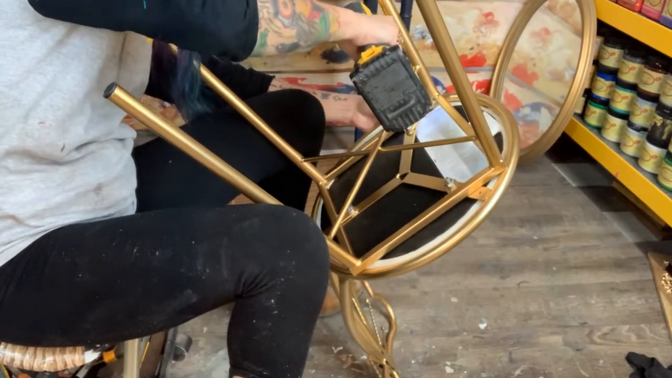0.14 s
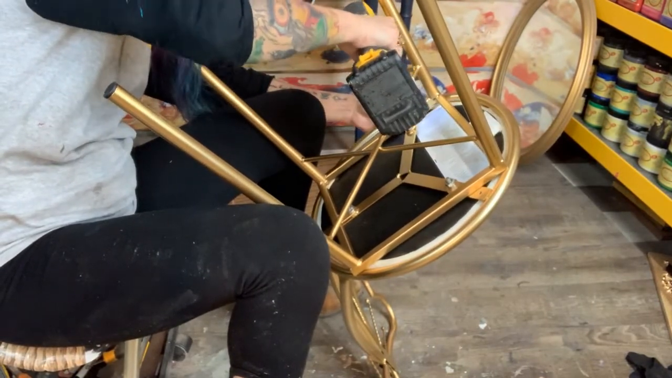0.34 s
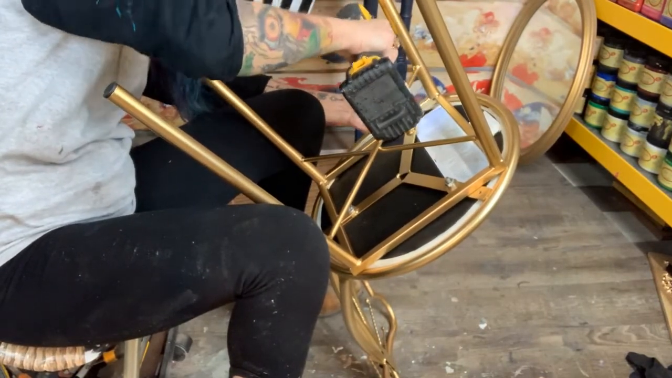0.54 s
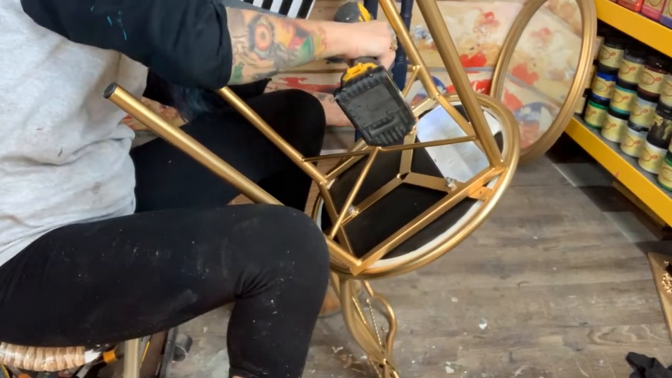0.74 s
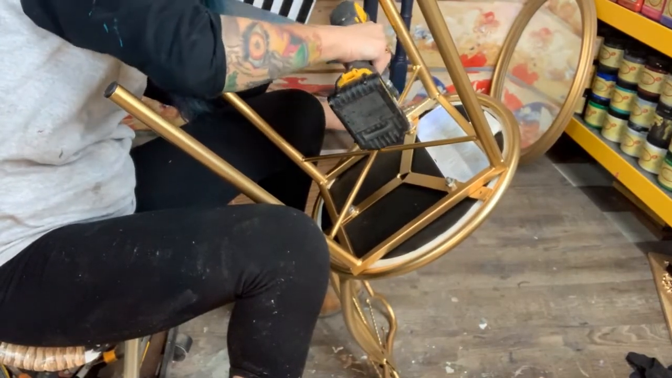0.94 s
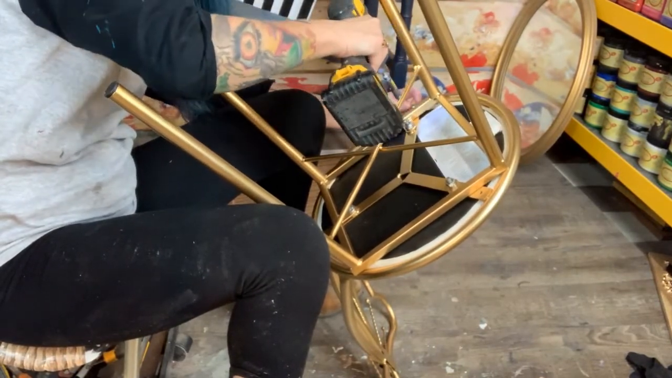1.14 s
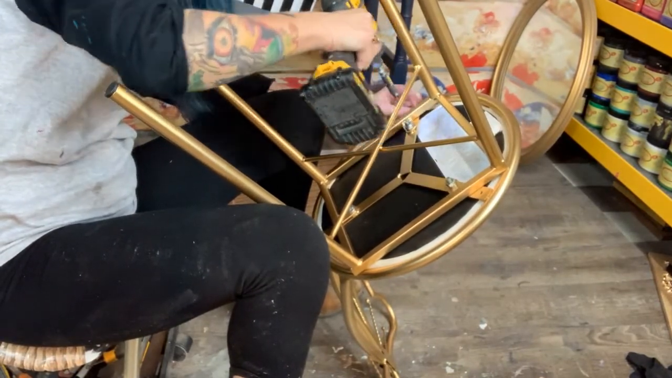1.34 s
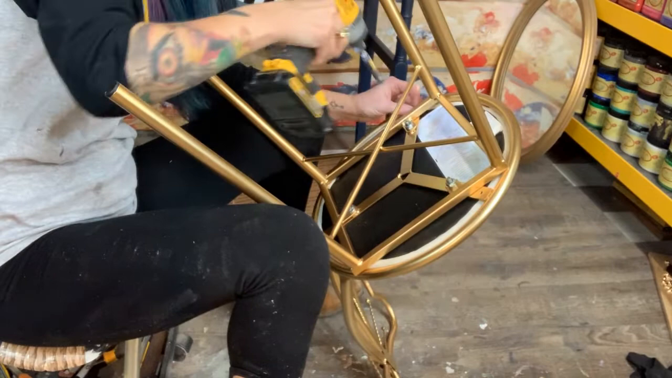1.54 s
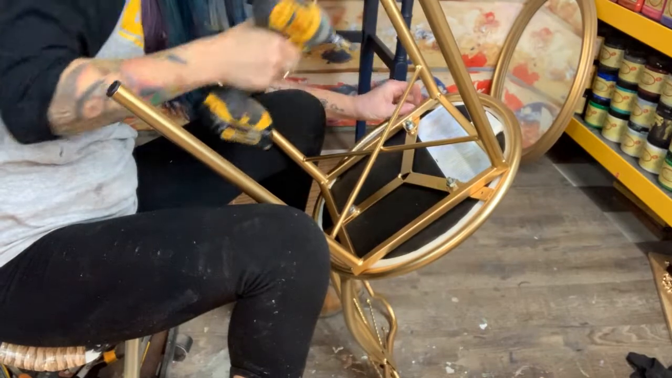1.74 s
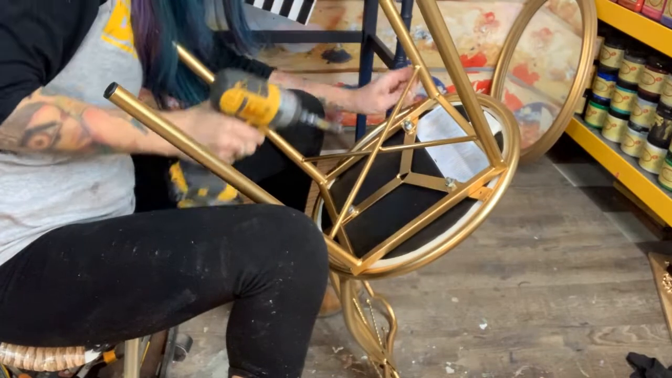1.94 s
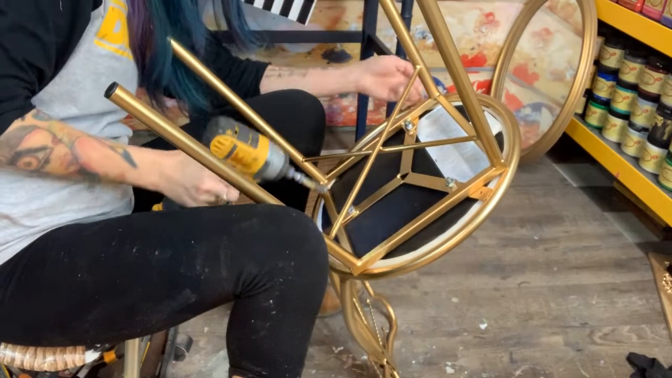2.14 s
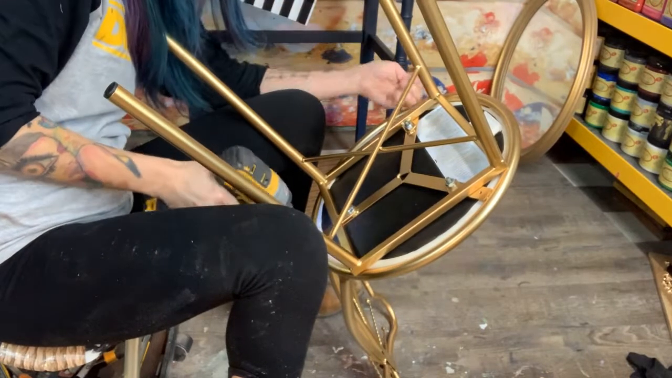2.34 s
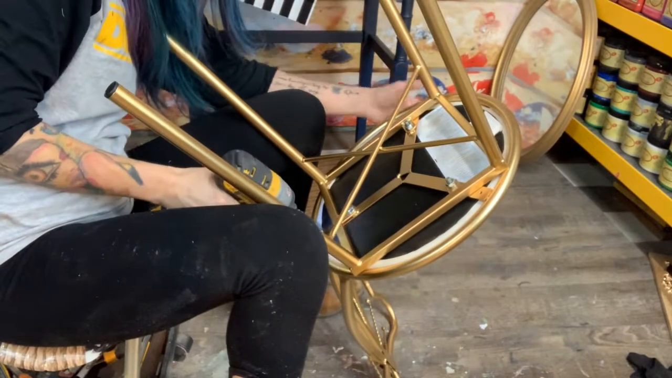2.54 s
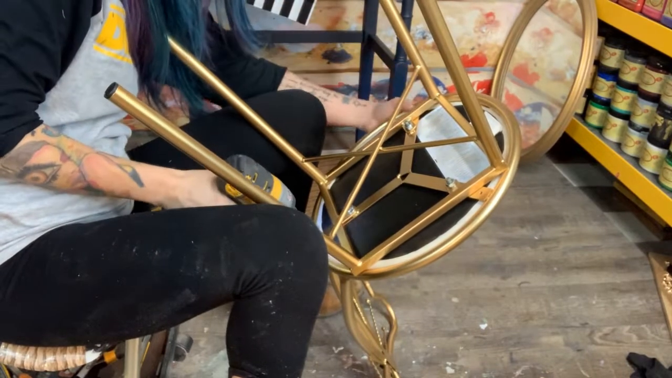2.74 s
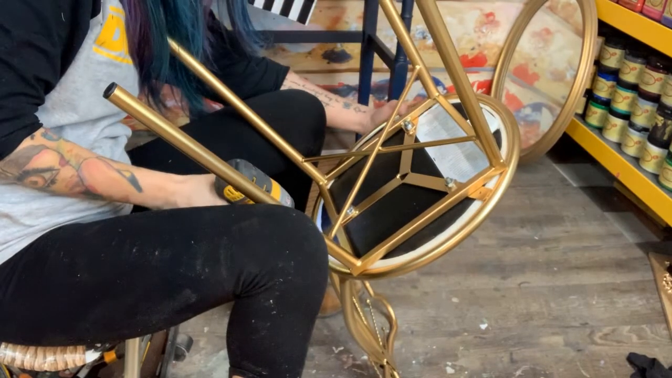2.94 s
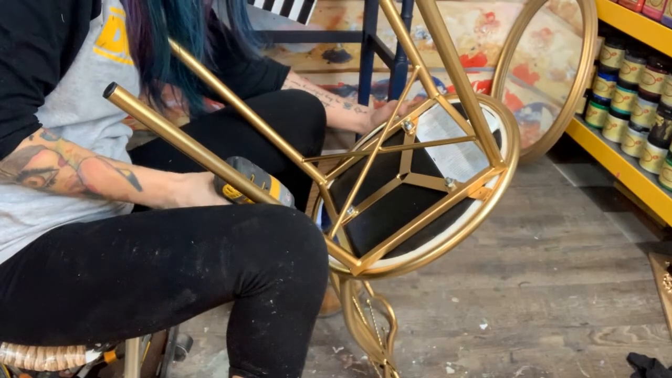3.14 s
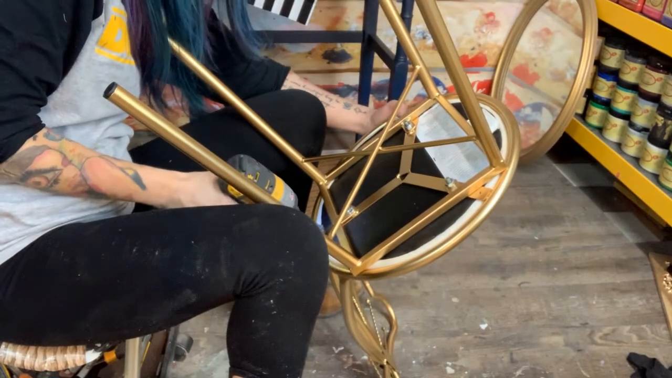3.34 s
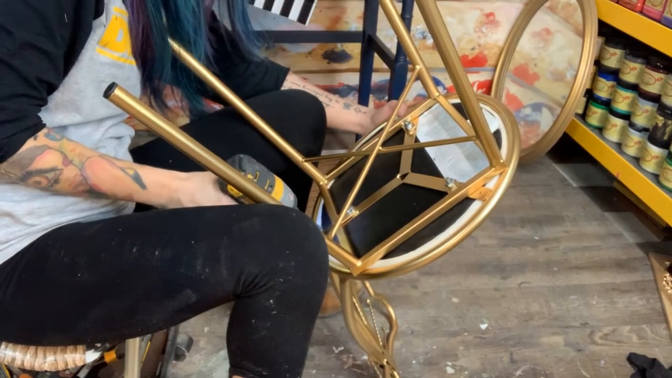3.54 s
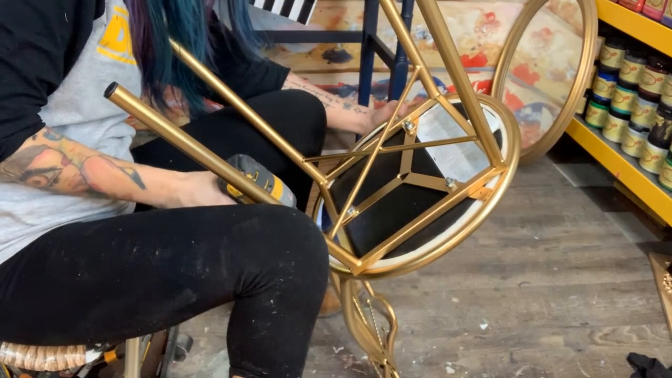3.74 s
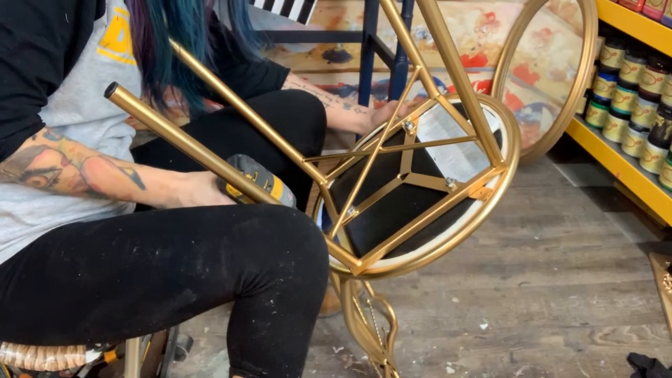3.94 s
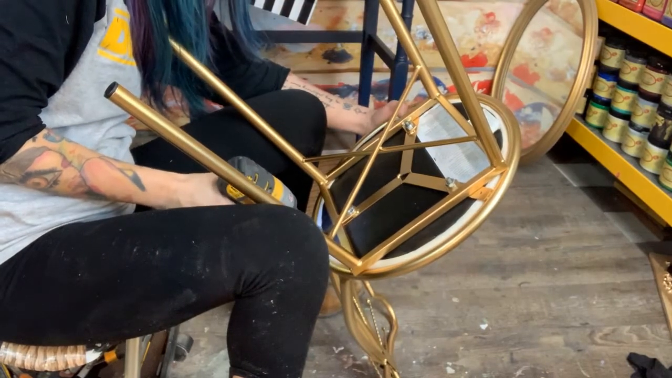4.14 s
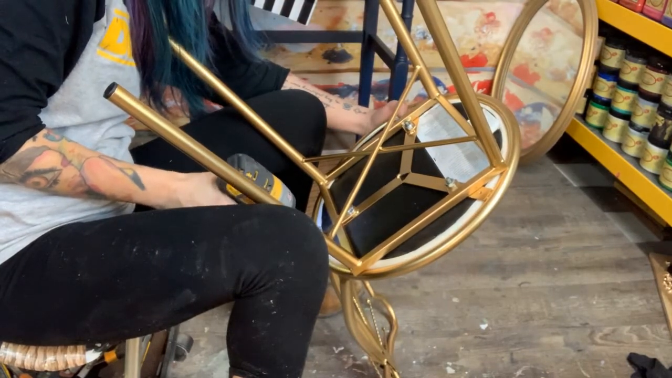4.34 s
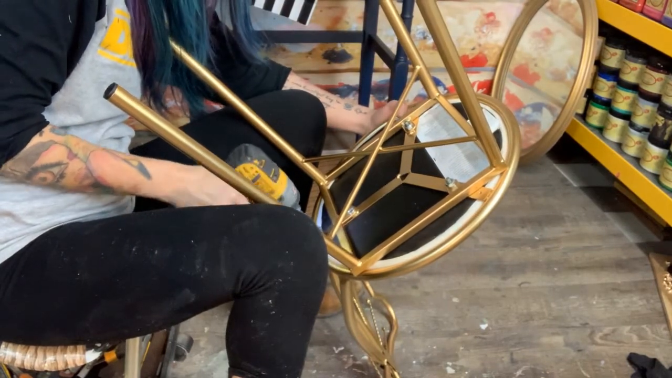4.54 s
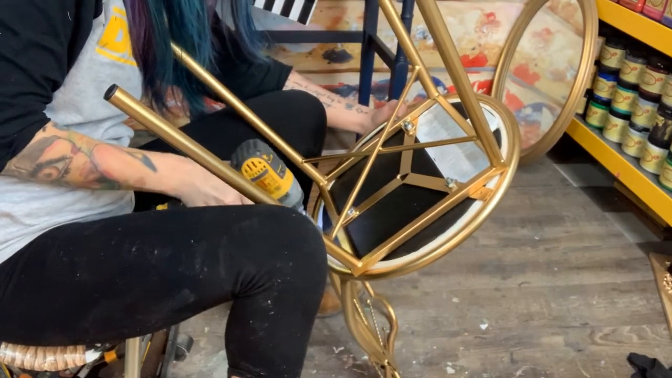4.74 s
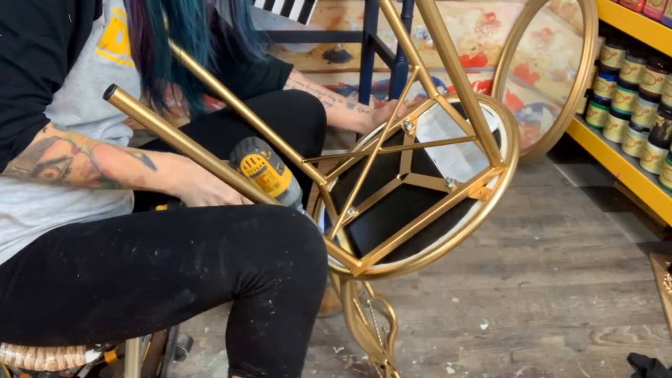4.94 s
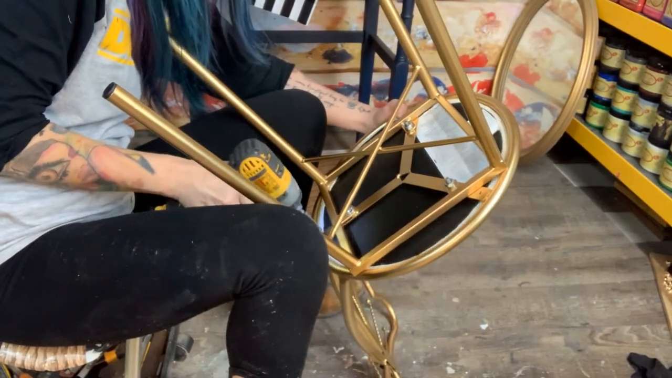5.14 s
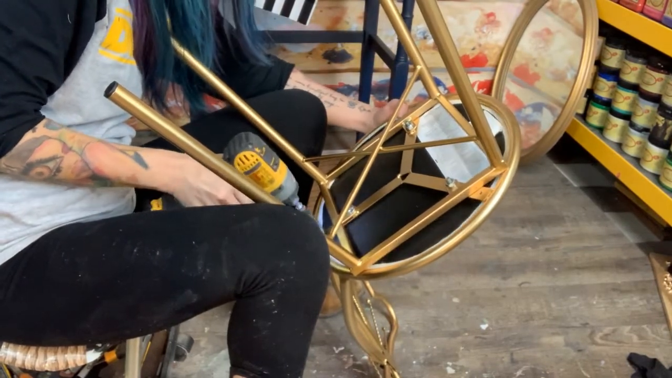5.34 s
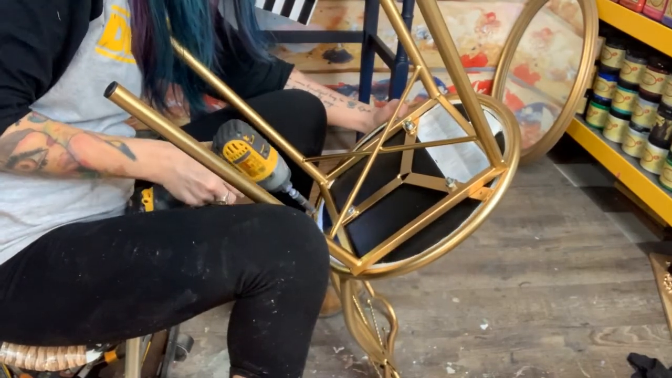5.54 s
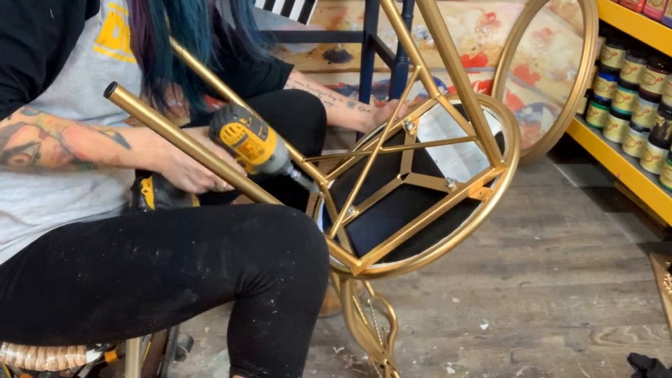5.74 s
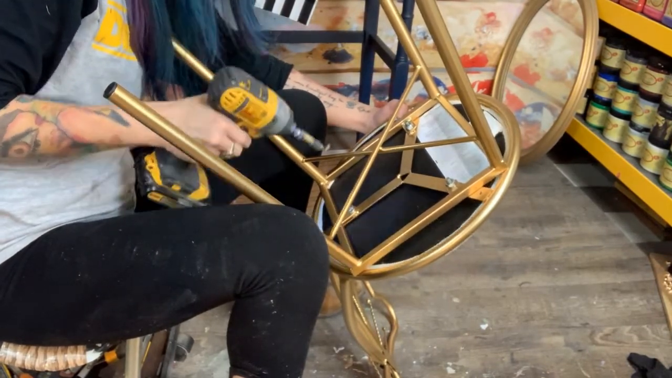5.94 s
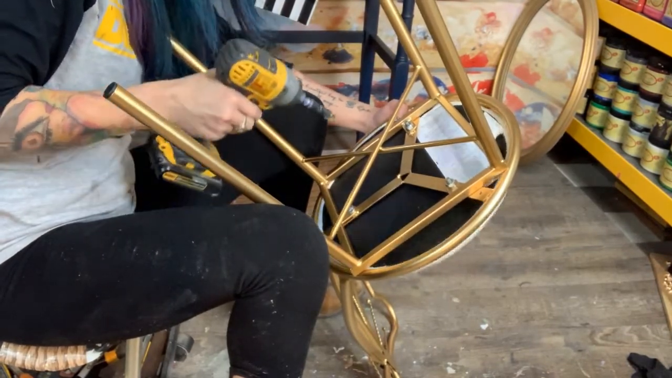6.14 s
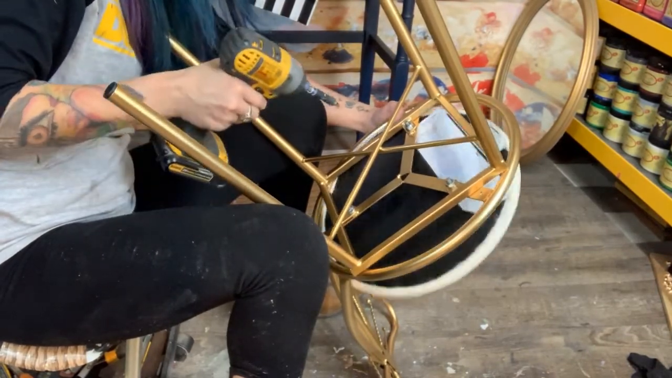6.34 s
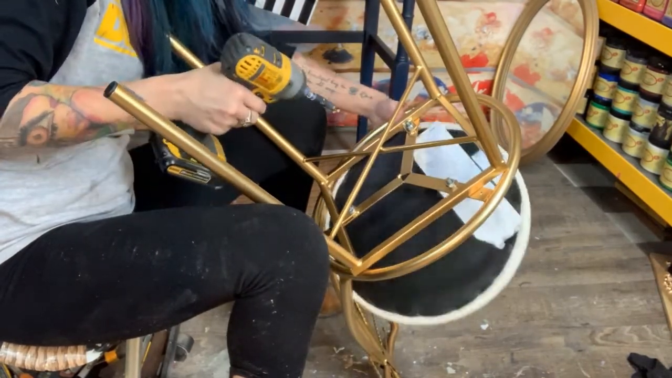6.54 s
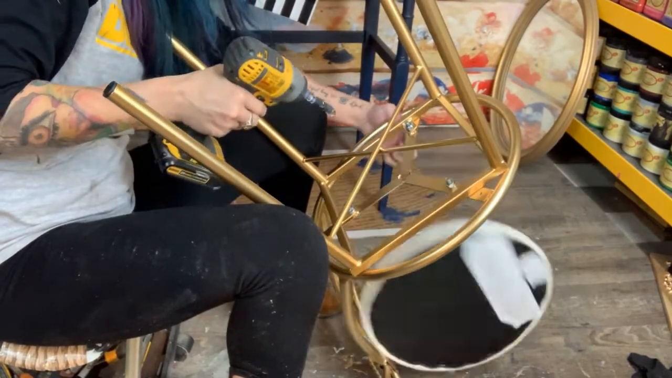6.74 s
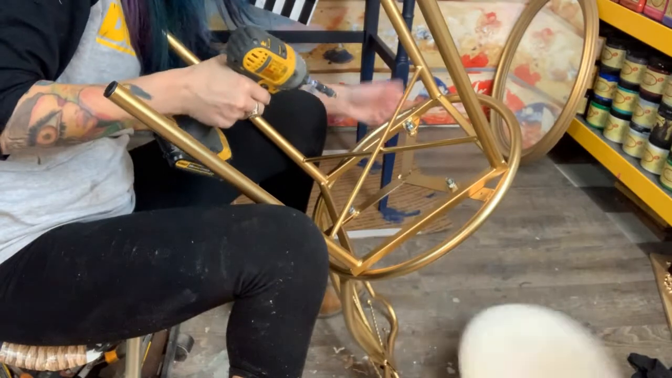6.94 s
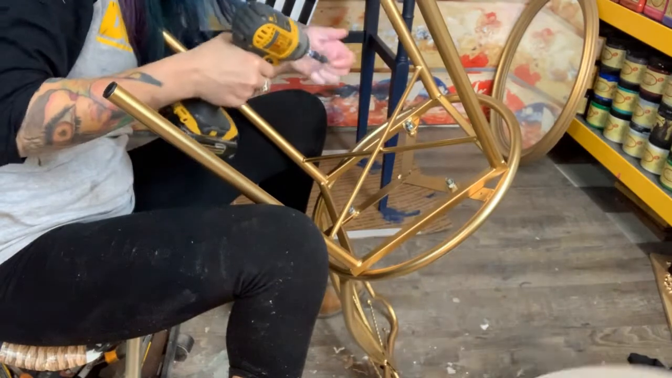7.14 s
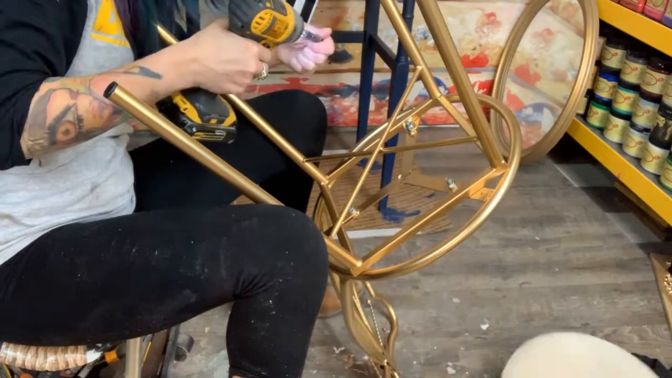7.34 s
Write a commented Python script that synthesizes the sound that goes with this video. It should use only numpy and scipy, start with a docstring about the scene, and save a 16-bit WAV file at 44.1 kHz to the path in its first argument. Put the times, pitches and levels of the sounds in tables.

```python
"""Ventilation rumbles as noise in a small shop while a cordless drill backs a screw out of an upturned metal stool.
The drill sums tones locked to its gear mesh with shaped noises: it spins up, whines and coasts down.
Then the bit ticks and scrapes on the frame as noise bursts, and the padded seat is knocked in damped modes.
The drill starts again with a clunk and backs out a second screw; at the end the seat drops, thumps and rolls
on a wooden floor. Two close microphone ports hear it."""
import sys
import numpy as np
from scipy import signal
from scipy.fft import rfft, irfft, next_fast_len
from scipy.io import wavfile
from scipy.ndimage import uniform_filter1d, map_coordinates

SR = 44100
rng = np.random.default_rng(int(sys.argv[2]) if len(sys.argv) > 2 else 0)


def inscribe(sig):
    """Save sig as 16-bit PCM at rate SR to the path in sys.argv[1].

    A 1-D sig is mono; a 2-D sig holds one channel per row.
    Samples are clipped to [-1, 1] before scaling.
    """
    pcm = np.round(np.clip(np.atleast_2d(sig).T, -1, 1) * 32767)
    wavfile.write(sys.argv[1], SR, pcm.astype(np.int16))


def volts_from_decibels(level):
    """Turn decibel levels (scalar or array-like) into linear amplitude factors."""
    exponent = np.asarray(level, float) / 20
    return 10 ** exponent


N = 330661

# likeness of the two channels of the room air and the drumming seat: pitch_hz, likeness (1 = same)
AIR_ALIKE = [(40, 0.95), (90, 0.82), (250, 0.98), (600, 0.2), (2000, 0.13), (10000, .5)]
# likeness of the two channels of close noises: pitch_hz, likeness (1 = same)
NEAR_ALIKE = [(300, 0.4), (1400, 0.57), (2500, 0.23), (4000, 0.29), (6500, 0.5), (9000, 1), (13000, 0.17)]


def unit(x, axis=None):
    """Scale to rms 1."""
    return x / np.sqrt(np.mean(x ** 2, axis, keepdims=True) + 1e-20)


def along(points, hz, column=1):
    """A column of a table that starts with Hz, read on a log frequency axis."""
    table = np.array(points, float)
    return np.interp(np.log(hz + 1), np.log(table[:, 0] + 1), table[:, column])


def curves(tables):
    """One value per sample for each column after the time; silence between tables."""
    rows = []
    for table in tables:
        silent = [-110] * len(table[0][1:])
        rows += [(table[0][0] - .01, *silent), *table, (table[-1][0] + .03, *silent)]
    s, *columns = np.transpose(rows)
    return [np.interp(np.arange(N) / SR, s, column) for column in columns]


def wobble(rate):
    """A smooth random curve, rate knots a second."""
    return map_coordinates(rng.standard_normal(int(N * rate / SR) + 4), [np.arange(N) * rate / SR])


def filtered(x, response):
    """x times a complex response of frequency."""
    m = next_fast_len(N + SR // 2)
    return irfft(rfft(x, m) * response(np.fft.rfftfreq(m, 1 / SR)), m)[..., :N]


def lump(hz, centre_hz, width_hz):
    """A causal resonance."""
    return 1j * hz * width_hz / (centre_hz ** 2 - hz ** 2 + 1j * hz * width_hz)


def twice_lump_db(centre_hz, width_hz):
    """The dB curve of noise passed through one resonance twice."""
    return lambda hz: 40 * np.log10(abs(lump(hz, centre_hz, width_hz)) + 1e-6)


def rush(gain_db, alike, patchy_db):
    """Stereo noise near rms 1 with patches of random gain in time and pitch; gain_db is a function of Hz."""
    z = signal.stft(rng.standard_normal((2, N)), nperseg=512)[2]
    field = uniform_filter1d(uniform_filter1d(rng.standard_normal(z.shape[1:]), 4, 0), 5, 1)
    pair = signal.istft(z * volts_from_decibels(patchy_db * unit(field)), nperseg=512)[1][:, :N]
    # the share of mid and side sets how alike the channels are
    angle = lambda hz: np.arccos(np.clip(along(alike, hz), -1, 1)) / 2
    mid, side = filtered(pair, lambda hz: volts_from_decibels(gain_db(hz)) * [np.cos(angle(hz)), np.sin(angle(hz))])
    return np.array([mid + side, mid - side]) / np.std(mid)


def ventilation():
    """Rumbling air noise whose level drifts slowly."""
    # colour of the air noise: pitch_hz, relative level_db (per Hz)
    air_colour = [(12, -59.5), (25, -27.5), (60, -2.5), (107, -4.5), (180, -17.5), (270, -20), (410, -32),
                  (530, -23.5), (700, -38.5), (1200, -46.5), (3000, -57.5), (8000, -64.5), (10000, -60.5),
                  (14000, -70.5), (15600, -85)]
    return volts_from_decibels(-34.5 + 2.1 * wobble(3.07)) * rush(lambda hz: along(air_colour, hz), AIR_ALIKE, patchy_db=1.0)


def housing_db(hz):
    """The plastic shell raises some bands and lowers others."""
    # housing bands: centre_hz, width_hz, relative gain_db
    housing_bands = [(1600, 300, -0.5), (2270, 160, -3), (2870, 210, 3.5), (3900, 400, 2.5),
                     (6470, 900, -2)]
    return sum(db / (1 + (2 * (hz - centre) / width) ** 2) for centre, width, db in housing_bands)


def drill_motion():
    """The mesh frequency carries the speed; its slope tells spinning up from coasting."""
    # the two drill runs: time_s, gear mesh_hz, relative grind_db, relative shell_rattle_db
    drill_runs = [
        [(0.0, 533.2, -52.5, -46), (0.016, 670.8, -34, -27.5), (0.088, 1345, -33, -25),
         (0.13, 1533, -31.5, -24.5), (0.21, 1690, -32, -29), (0.294, 1722, -32.5, -31),
         (0.41, 1561, -31.5, -30.5), (0.572, 1200, -34, -34.5), (0.712, 870, -38, -36), (0.86, 603.4, -40, -39),
         (1.0, 354.8, -39, -41), (1.136, 170.3, -47, -47), (1.32, 60, -77.5, -80)],
        [(4.68, 399.7, -61.5, -55), (4.7, 500, -45.5, -40), (4.724, 682.2, -31, -24.5),
         (4.802, 1428, -29, -19.5), (4.85, 1657, -27.5, -23.5), (4.914, 1804, -26.5, -25.5),
         (4.97, 1864, -26.5, -26.5), (5.056, 1889, -27.5, -28), (5.194, 1804, -27.5, -28),
         (5.384, 1501, -31.5, -30.5), (5.644, 926, -37, -33.5), (5.79, 666, -36.5, -32.5),
         (5.92, 451, -38.5, -36), (6.066, 200, -43.5, -43.5), (6.19, 60, -58, -59.5)],
    ]
    s, mesh_hz = np.transpose(sum(drill_runs, []))[:2]
    speed = uniform_filter1d(np.interp(np.arange(N) / SR, s, mesh_hz), size=900)
    turn = 2 * np.pi * np.cumsum(speed) / SR  # mesh phase
    grind_db, shell_db = curves(drill_runs)[1:]
    gaining = np.clip(np.gradient(speed) * SR / 5400, 0, 1)  # 1 = mesh rising 5400 Hz a second or more
    slow = np.clip(1.3 - speed / 1450, 0, 1) * (1 - gaining)  # coasting towards rest
    return speed, turn, grind_db, shell_db, gaining, slow


def gear_tones(speed, turn, grind_db, gaining, slow):
    """Meshing teeth whine at the mesh pitch, with other gear and commutator tones at multiples of it."""
    # the whine passes through the gearbox resonances: mesh_hz, relative level_db over the grind
    gearbox = [(200, -12), (300, -17), (400, -5.5), (560, 2), (700, 0.5), (880, -5), (1000, -19),
               (1300, -17), (1450, -11), (1580, -1), (1700, -7.5), (1880, -1)]
    # other gear and commutator tones: multiple of the mesh, relative full_speed_db, relative near_rest_db
    orders = [(.9, -27, -31), (1.8, -23, -20), (2, -20.5, -14.5), (2.4, -20.5, -20), (2.7, -20.5, -15),
              (3.6, -21.5, -22.5), (4.5, -15.5, -31)]
    stop_hz = 200  # below this mesh pitch the gears fall silent
    spinning = np.clip(speed / stop_hz - 1, 0, .1) * 10
    whine_db = grind_db + along(gearbox, speed) * (1 - .3 * gaining) - 2 * gaining
    whine_db = whine_db + (4.5 - 2.2 * slow) * wobble(45)
    # unevenly cut teeth: the mesh tone beats once per shaft turn and trembles in phase
    tremble = (.35 + .8 * gaining) * wobble(80)
    beat = 1 + 0.26 * np.sin(turn / 18)
    whine = spinning * np.sqrt(2) * volts_from_decibels(whine_db) * beat * np.sin(turn + tremble)
    # higher multiples tremble more, and come and go
    multiples = 0
    for multiple, db, rest_db in orders:
        order_db = db + slow * (rest_db - db) + 3 * wobble(9)
        multiples = multiples + volts_from_decibels(order_db) * np.sin(multiple * (turn + tremble))
    # the teeth bite harder while the motor speeds up
    bite_db = 3 * gaining
    multiples = spinning * volts_from_decibels(grind_db + bite_db + 8.5) * multiples
    return whine + filtered(multiples, lambda hz: volts_from_decibels(1.3 * housing_db(hz)))


def drill_noise(speed, turn, grind_db, shell_db, slow):
    """Brushes and fan hiss, gears grind, shell and chuck rattle, fluttering with the shaft; the seat drums along."""
    # brush and fan hiss: pitch_hz, relative level_db (per Hz)
    hiss_colour = [(1470, -37), (2500, -11), (2810, -6), (6480, 2.5), (8540, -4), (9080, -11), (9300, -2),
                   (9960, -1.5), (10800, -7), (14600, -15), (15700, -34)]
    # gear grind: pitch_hz, relative level_db (per Hz)
    grind_colour = [(150, -54), (250, -17.5), (372, -11), (434, -13.5), (554, -4.5), (910, -8), (1750, 0.5),
                    (2110, -5), (2870, -6), (3500, -5.5), (4550, -30), (7700, -120)]
    # bands in which the drill's shell rattles: centre_hz, width_hz, relative level_db
    shell_bands = [(2870, 300, -9), (4260, 1400, -3.5), (5560, 710, -3.5), (6700, 1100, 0.5)]
    full_hz = 1793  # mesh at full speed
    octaves = np.log2(np.maximum(speed, 350) / full_hz)
    hiss_db = shell_db + 4 + 6 * octaves + 1.5 * wobble(23)  # grows 6 dB per octave of speed
    # the chuck ring stands out more near rest
    chuck_full_db, chuck_rest_db = -19, -8.5  # from the grind curve
    chuck_db = grind_db + chuck_full_db + slow * (chuck_rest_db - chuck_full_db) + 3 * wobble(25)
    # the drumming grows three times as fast as the grind, from -40 dB at a hard grind of -27 dB
    seat_db = -40 + 3 * (grind_db + 27) + 3 * wobble(25)

    def shell_colour_db(hz):
        total = sum(volts_from_decibels(db) * abs(lump(hz, centre, width)) ** 2 for centre, width, db in shell_bands)
        return 20 * np.log10(total + 1e-6)

    hiss = volts_from_decibels(hiss_db) * rush(lambda hz: along(hiss_colour, hz), NEAR_ALIKE, patchy_db=2.5)
    grind = rush(lambda hz: along(grind_colour, hz) + housing_db(hz), NEAR_ALIKE, patchy_db=2.5)
    grind = volts_from_decibels(grind_db - 1.5) * grind
    rattle = unit(volts_from_decibels(1.8 * wobble(400)))
    shell = rattle * volts_from_decibels(shell_db - 1.0) * rush(shell_colour_db, NEAR_ALIKE, patchy_db=4.0)
    chuck = volts_from_decibels(chuck_db) * rush(twice_lump_db(2220, 180), NEAR_ALIKE, patchy_db=3)
    seat = volts_from_decibels(seat_db) * rush(twice_lump_db(250, 120), AIR_ALIKE, patchy_db=0.0)
    flutter = 1 + 0.045 * np.sin(turn / 18) + 0.1 * wobble(250)
    return flutter * volts_from_decibels(0.45 * wobble(25)) * (hiss + grind + shell + chuck) + seat


def drill():
    """Gears, brushes and shell all follow one motor speed. Returns tones and noise."""
    speed, turn, grind_db, shell_db, gaining, slow = drill_motion()
    tones = gear_tones(speed, turn, grind_db, gaining, slow)
    return tones, drill_noise(speed, turn, grind_db, shell_db, slow)


def room(x):
    """Each frequency of the room's answer dies at its own speed, differently at each port."""
    # reverberation: pitch_hz, t60_s
    room_decay = [(150, 0.33), (1000, 0.15), (5000, 0.094), (12000, 0.043)]
    hz, t, z = signal.stft(rng.standard_normal((2, SR // 2)), SR, nperseg=256)
    tail = signal.istft(z * volts_from_decibels(-60 * t / along(room_decay, hz)[:, None]), SR, nperseg=256)[1]
    late = np.pad(x, (200, 0))[None]  # the answer starts 200 samples late
    return signal.fftconvolve(late, tail / np.linalg.norm(tail[0]), axes=1)[:, :N]


def ticks():
    """Each contact is a sudden grainy rattle, bright in the steel and dull in the seat, that dies away on its
    own: a quick snap, then a longer fade."""
    # hard contacts, bit on frame and later rim of the seat:
    # start_s, relative bright_db, bright_hz, relative dull_db, dull_hz
    contacts = [(1.444, -70, 2620, -57, 1050), (1.6086, -41, 4500, -43, 1700),
                (1.8484, -48.5, 6610, -47.5, 2120), (1.8966, -34, 6060, -54.5, 1690),
                (1.9445, -37, 3260, -68.5, 756), (2.8674, -42, 6000, -45.5, 1580),
                (2.9074, -37.5, 5460, -36.5, 1060), (2.9873, -37.5, 6580, -46, 1160),
                (3.0014, -49.5, 6600, -36.5, 587), (3.358, -59, 6430, -36, 760),
                (3.466, -35, 5690, -52, 2480), (3.5004, -39.5, 3140, -45.5, 703),
                (4.1545, -34, 3310, -31, 1070), (4.369, -22, 5850, -37.5, 1120),
                (4.4953, -13.5, 5300, -23.5, 1177), (6.2023, -36, 5560, -52, 1955),
                (6.2154, -45.5, 5800, -57, 2020), (6.758, -45, 3000, -39, 900),
                (6.78, -54, 2880, -25.5, 990), (6.9002, -32.5, 5170, -35.5, 1450),
                (6.9817, -32.5, 6330, -21, 704), (7.256, -31, 3360, -38, 780),
                (7.3062, -41, 3094, -36, 755), (7.3607, -37, 5880, -50.5, 767),
                (7.4195, -52, 2550, -35, 780)]
    # bands in which the steel frame rattles: centre_hz, width_hz, relative level_db
    frame_bands = [(2100, 170, -3.5), (2830, 150, -3), (3356, 170, 1.5), (3930, 330, 1.5), (4510, 250, -5),
                   (5140, 300, -1.5), (5800, 580, 4), (6320, 350, 4), (7070, 220, -1.5)]
    rise_s, t60_s, snap_t60_s = 0.0024, 0.27, 0.029
    out, t = np.zeros((2, N + SR)), np.arange(SR // 2) / SR
    hz = np.fft.rfftfreq(len(t), 1 / SR)
    for s, db, bright_hz, dull_db, dull_hz in contacts:
        shared, own = rng.standard_normal((2, 1, len(t))), rng.standard_normal((2, 2, len(t)))
        shared = shared + 25 * (t == t.min())  # the first blow is one sharp push
        frame = 0.38
        for centre, width, level in frame_bands:
            frame = frame + volts_from_decibels(level + rng.normal(0, 6.8)) * lump(hz, centre, width)
        bright_colour = frame * lump(hz, bright_hz, 1.1 * bright_hz) ** 2
        dull_colour = lump(hz, dull_hz, .9 * dull_hz) ** 2
        colours = np.array([bright_colour, dull_colour])[:, None]
        bright, dull = unit(irfft(rfft(shared + own) * colours, len(t)), axis=(1, 2))
        chatter = volts_from_decibels(1.2 * wobble(200)[:len(t)])
        fade = chatter * volts_from_decibels(-60 * t / t60_s) + 1.2 * volts_from_decibels(-60 * t / snap_t60_s)
        fade = (1 - np.exp(-t / rise_s)) * fade
        out[:, round(s * SR):][:, :len(t)] += fade * (volts_from_decibels(db - 13.5) * bright + volts_from_decibels(dull_db - 4.5) * dull)
    return out[:, :N]


def rubs():
    """Grainy sliding contact: a bright, a dull and a fizzing part."""
    # bit and hands sliding on the frame, then the seat rolling:
    # peak_s, relative bright_db, relative dull_db, relative fizz_db, t60_s
    slides = [(1.722, -47.5, -55, -56.5, 0.44), (1.776, -52.5, -68, -54.5, 0.098),
              (2.468, -64.5, -78, -72, .25), (3.136, -65.5, -61, -90, .15), (3.72, -69, -68, -82, .2),
              (4.36, -37, -36, -39, 0.25), (4.44, -47.5, -37.5, -70, 0.33), (4.49, -37, -42, -54.5, 0.087),
              (6.214, -57, -54, -80, 0.23), (6.4, -66, -74, -80, 1.9), (6.519, -58, -57, -69, 1),
              (6.8, -51, -34.5, -68, .3), (6.91, -47, -45, -59, .2), (7.01, -41.5, -35.5, -55.5, 0.49),
              (7.156, -44.5, -54, -52, 0.29), (7.266, -50.5, -41.5, -54.5, 0.49),
              (7.366, -44, -45, -54, 0.23), (7.432, -59, -43.5, -77, 0.4),
              (7.495, -39.5, -43.5, -55.5, 0.5)]
    # bright rub: pitch_hz, relative level_db (per Hz)
    bright_colour = [(1290, -27), (2200, -4), (2610, -8), (3300, -5), (5080, -2.5), (5620, 2.5), (9000, -7),
                     (11700, -38), (19800, -120)]
    # dull rub: pitch_hz, relative level_db (per Hz)
    dull_colour = [(290, -48), (500, -6.5), (822, 1), (1130, -8), (1670, -6), (1800, -18.5), (2800, -26),
                   (3640, -49), (6160, -120)]
    swell = 0.18  # a rub swells in this share of the time that it takes to fade
    s, *peak_db, t60 = np.transpose(slides)
    # the envelopes are drawn every 32 samples, as powers that add up
    late = (np.arange(0, N + 32, 32) / SR - s[:, None]) / np.abs(t60)[:, None]
    power = volts_from_decibels(peak_db) ** 2 @ volts_from_decibels(-60 * np.maximum(late, -late / swell)) ** 2
    bright, dull, fizz = np.sqrt(np.repeat(power, 32, axis=1)[:, :N])
    grain = unit(volts_from_decibels(1.4 * wobble(300)))
    bright = bright * volts_from_decibels(-1.5) * rush(lambda hz: along(bright_colour, hz), NEAR_ALIKE, patchy_db=1.6)
    dull = dull * volts_from_decibels(-3.5) * rush(lambda hz: along(dull_colour, hz), NEAR_ALIKE, patchy_db=2.5)
    fizz = fizz * rush(twice_lump_db(11000, 5000), NEAR_ALIKE, patchy_db=1.6)
    return grain * (bright + dull + fizz)


def ring(modes, t, scatter_db):
    """Damped modes, each struck at a strength scattered by scatter_db."""
    total = 0
    for hz, db, t60 in modes:
        total = total + volts_from_decibels(db + rng.normal(0, scatter_db) - 60 * t / t60) * np.sin(2 * np.pi * hz * t)
    return total


def thumps():
    """Soft knocks, a clunk and landings: a push, low modes and a dull rumble; apart, the boom of the floor."""
    # two knocks in the seat, a clunk as the drill starts again, then the seat lands and rolls:
    # start_s, relative push_db, push_hz, relative floor_boom_db
    blows = [(3.003, -24, 622, -29.5), (4.5, -22, 218, -36), (4.723, -27, 624, -45),
             (6.746, -18, 242, -28.5), (6.902, -15, 258.6, -27.5), (6.984, -5.5, 243.5, -18),
             (7.019, -19.5, 161.2, -24.5), (7.079, -30, 132.5, -22.5), (7.129, -31, 259, -28.5),
             (7.255, -22, 206, -33), (7.299, -22, 274.2, -33), (7.423, -24, 294, -28),
             (7.46, -25, 226.5, -27.5)]
    # modes of the seat: pitch_hz, relative level_db, t60_s
    seat_modes = [(165, -2, 0.16), (240.3, 3, 0.21), (338, -9, 0.091), (471.6, -6, .12), (710, -12, 0.08),
                  (931, -15.5, 0.047)]
    out, t = np.zeros((2, N + SR)), np.arange(SR // 2) / SR
    hz = np.fft.rfftfreq(len(t), 1 / SR)
    for s, db, push_hz, boom_db in blows:
        rumble = unit(irfft(rfft(rng.standard_normal(len(t))) * lump(hz, 180, 200) ** 2, len(t)))
        push = ring([(push_hz, 0, .05)], t, scatter_db=2.5)
        seat = ring(seat_modes, t, scatter_db=2.5)
        blow = push + 0.17 * seat + 0.18 * volts_from_decibels(-60 * t / 0.23) * rumble
        boom = volts_from_decibels(boom_db - 2.5) * ring([(56, 0.0046, 0.66), (106.4, 0, 0.59)], t, scatter_db=0)
        rise = 1 - np.exp(-t / 0.0024)
        out[:, round(s * SR):][:, :len(t)] += rise * np.array([volts_from_decibels(db + 1.0) * blow, boom])
    return out[:, :N]


def scene():
    """All sources in the shop; the room answers the drill tones and the thumps."""
    air = ventilation()
    tones, roar = drill()
    thump, boom = thumps()
    wet = room(volts_from_decibels(-9.5) * tones + volts_from_decibels(-6.5) * thump)
    return volts_from_decibels(-2.5) * tones + thump + boom + wet + roar + ticks() + rubs() + air


def band_limit(x):
    """A steep low-pass at the top of the band."""
    return signal.sosfilt(signal.butter(12, 15820, fs=SR, output="sos"), x)


def record(dry):
    """The two ports differ in level and phase; a dip in the treble flickers."""
    # the port pair: pitch_hz, left_over_right_db, left_lead_rad
    ports = [(60, -2, 0), (130, 3, -0.57), (280, 6, -1.5), (451.3, 0.5, -0.77), (650, 0, -1.4),
             (900, 1.7, -1.2), (1520, 1.3, 0.15), (4000, 0.55, 0.21), (12000, -0.2, 0.87)]
    # the treble dips between narrow peaks: pitch_hz, gain_db where the flicker is full
    treble_dip = [(8200, 0), (8300, 9), (8460, 5), (8800, -10.5), (8960, 13), (9060, -20.5), (9520, -18.5),
                  (9630, 17.5), (9720, 1.5)]
    # each port takes half of the difference
    half = lambda hz: volts_from_decibels(along(ports, hz) / 2) * np.exp(.5j * along(ports, hz, column=2))
    heard = filtered(dry, lambda hz: np.array([half(hz), 1 / half(hz)]))
    flicker = np.clip(.9 + 1.5 * wobble(13), 0, 1)
    heard = heard + flicker * filtered(heard, lambda hz: volts_from_decibels(along(treble_dip, hz)) - 1)
    return band_limit(heard)


dry = scene()
out = record(dry)
inscribe(out)
```